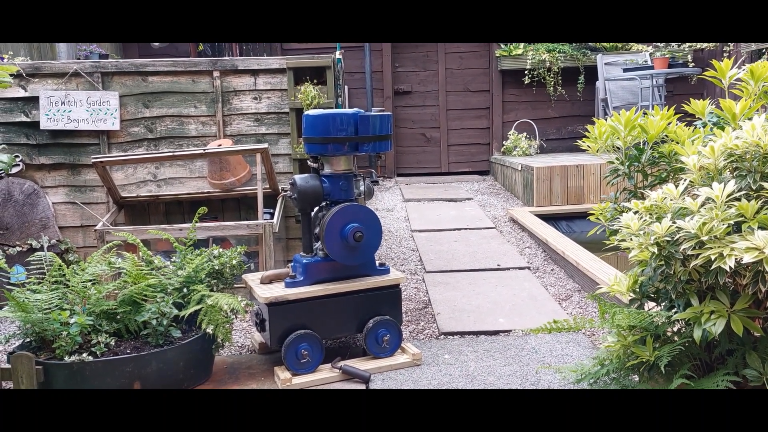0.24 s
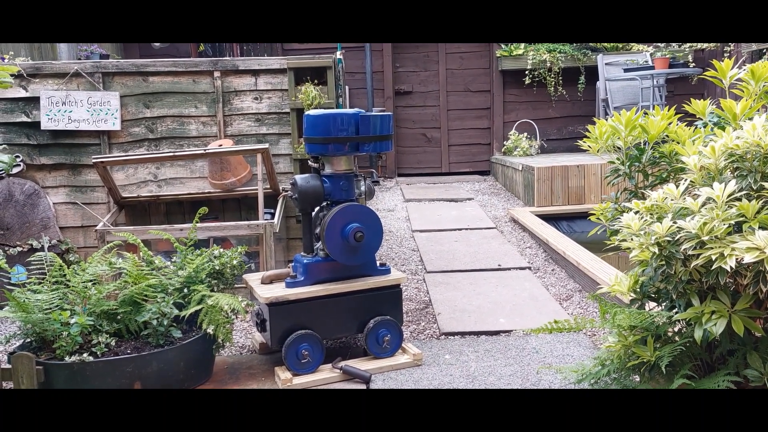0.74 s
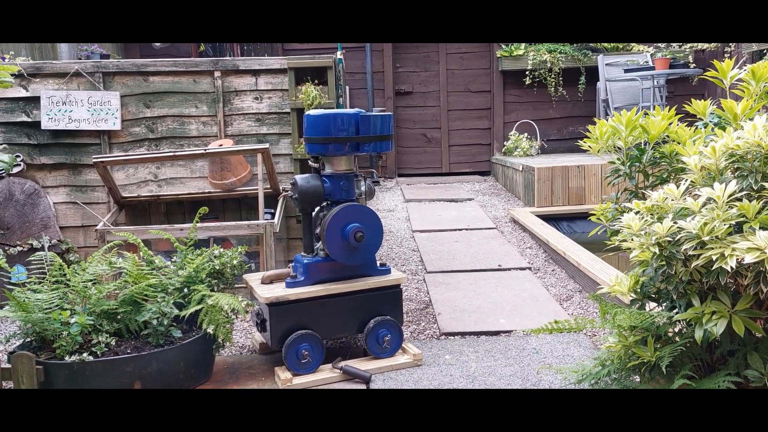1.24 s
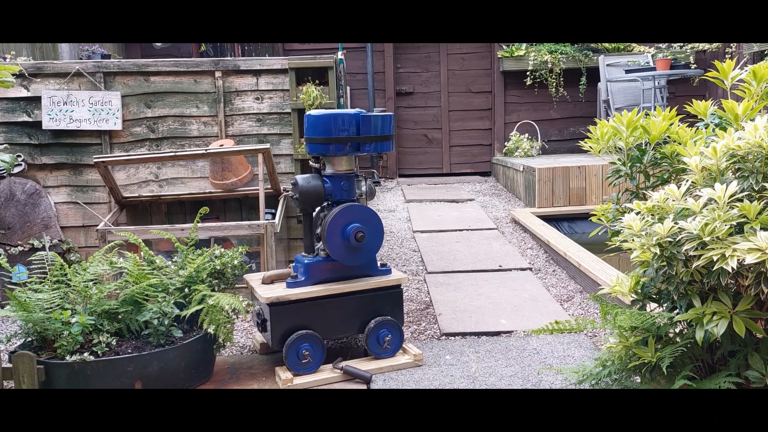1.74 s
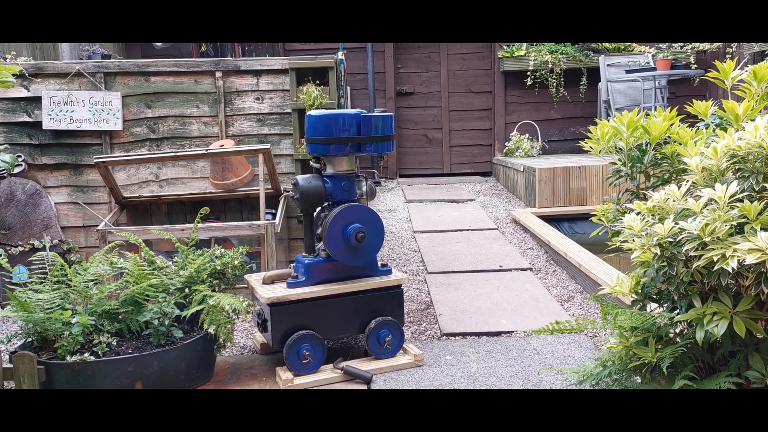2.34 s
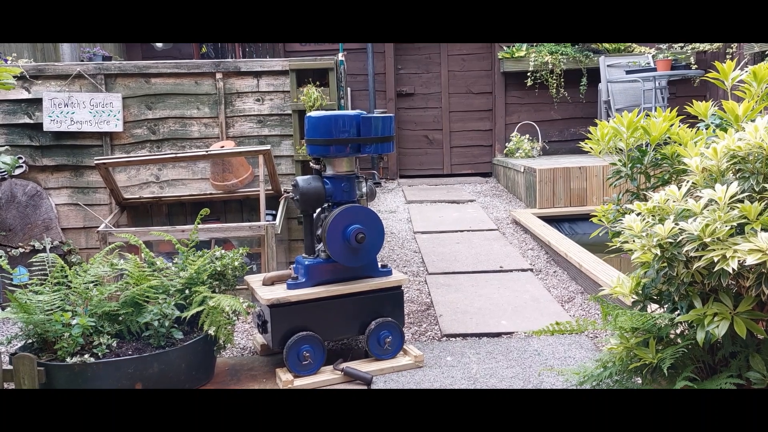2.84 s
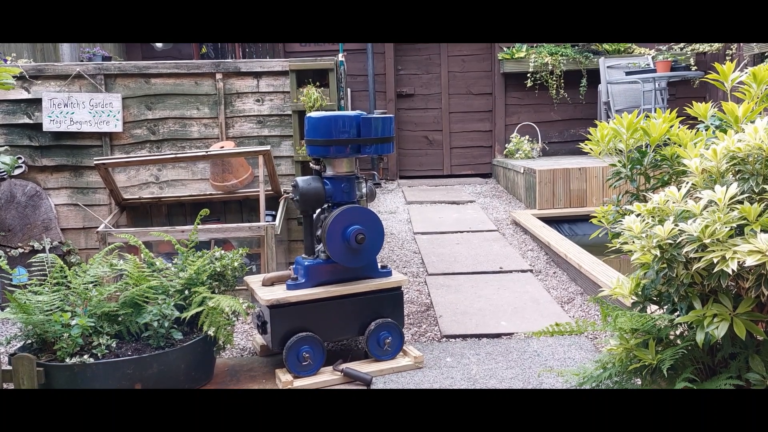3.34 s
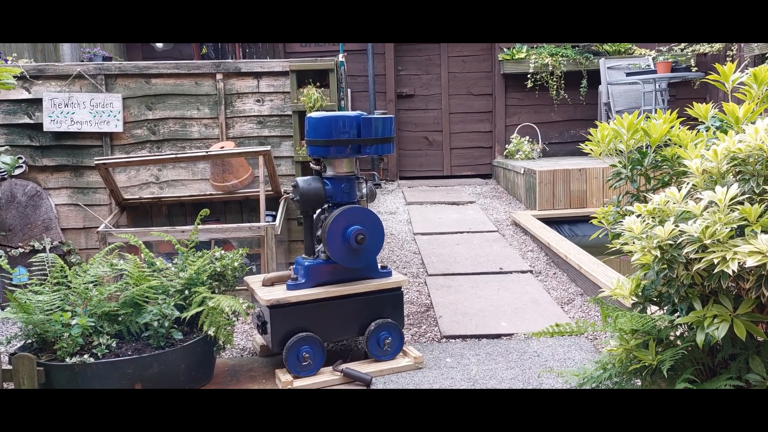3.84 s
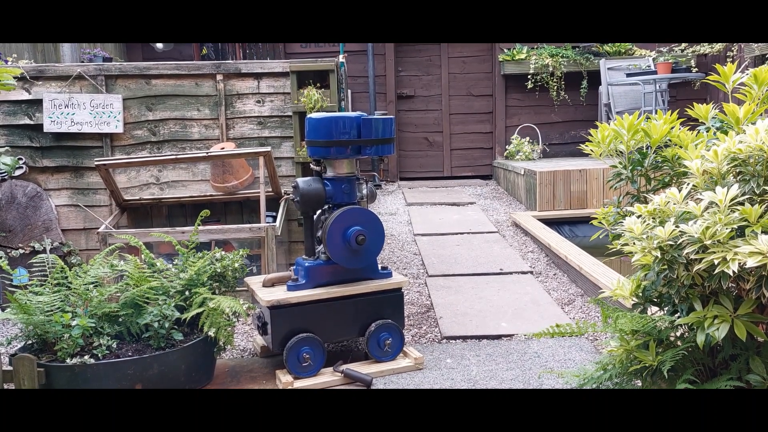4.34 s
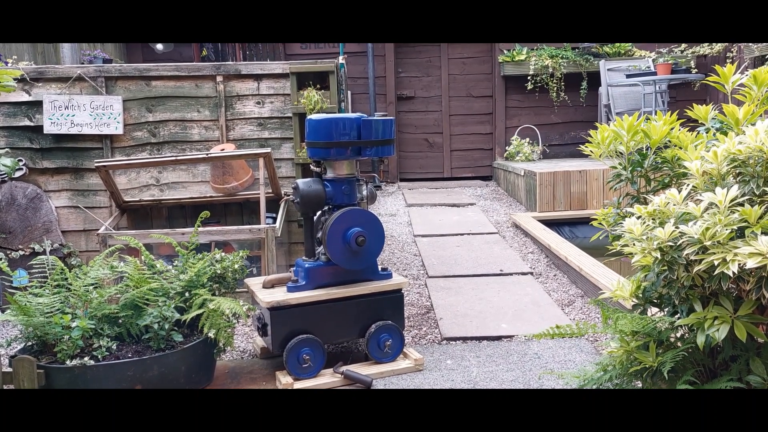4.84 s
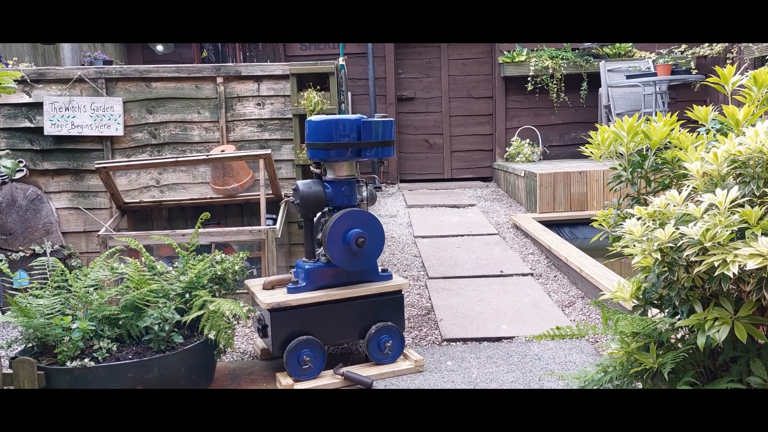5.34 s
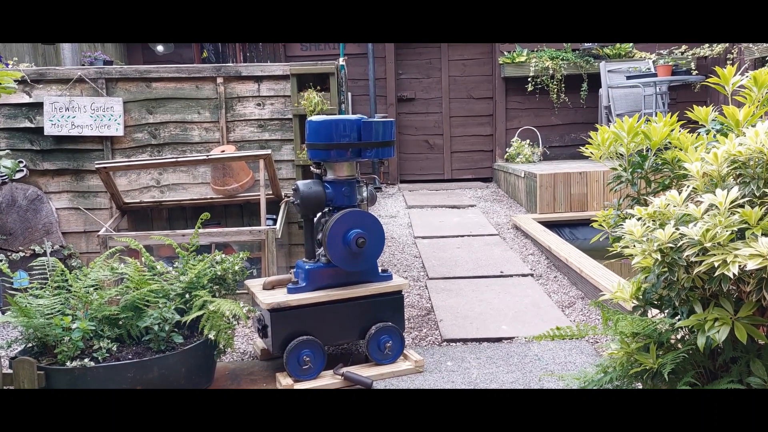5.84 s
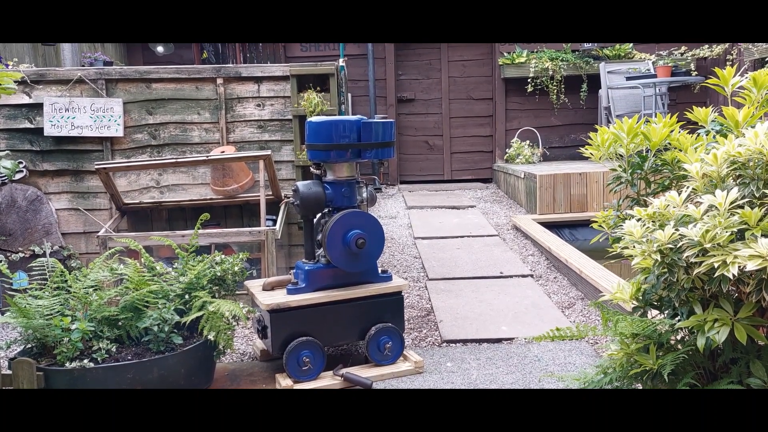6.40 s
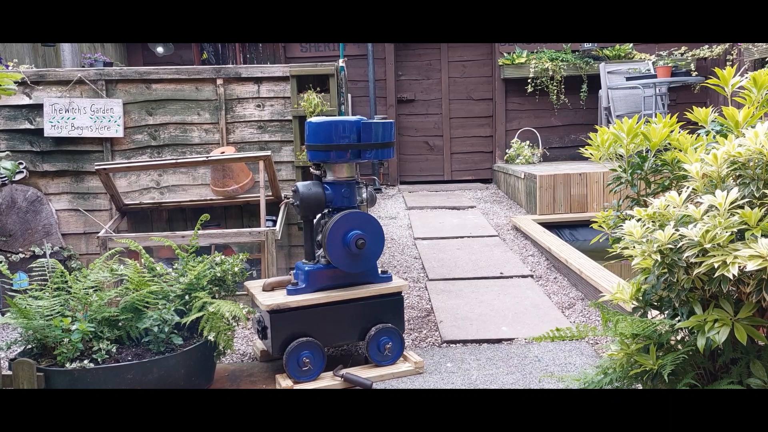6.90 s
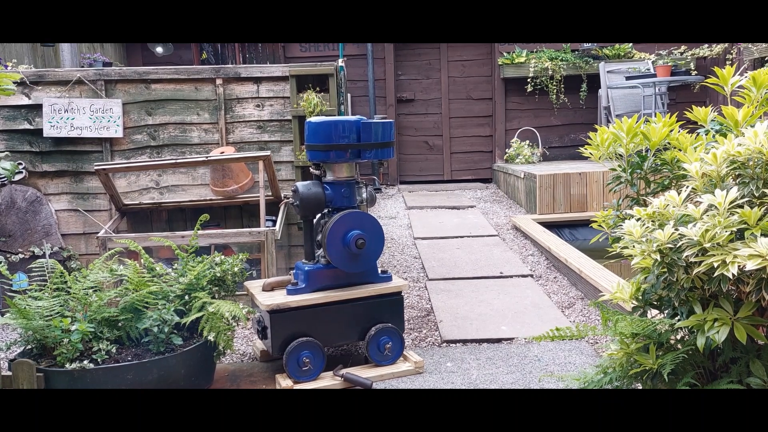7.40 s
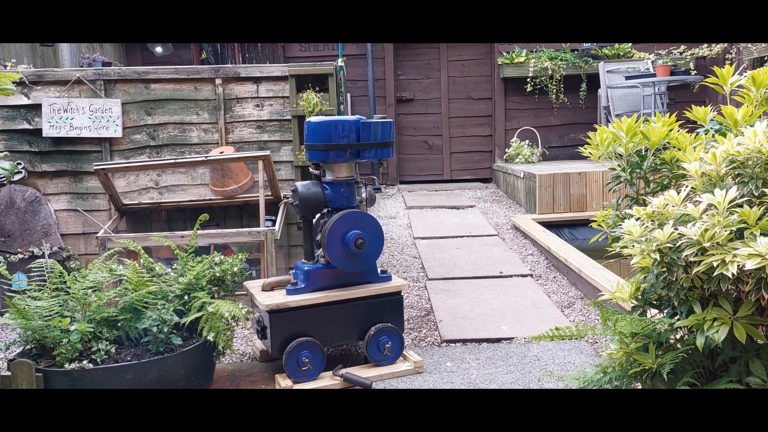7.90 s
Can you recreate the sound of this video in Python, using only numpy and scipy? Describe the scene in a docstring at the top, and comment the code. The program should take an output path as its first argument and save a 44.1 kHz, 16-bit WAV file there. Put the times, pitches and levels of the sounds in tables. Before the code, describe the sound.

A small single-cylinder petrol engine idles off load in a garden, irregular bursts of thumping, barking exhaust over fast, even mechanical ticking and hiss.

```python
"""Back garden: a small single-cylinder four-stroke engine runs off load, about 13 cycles a second.
It fires in short bursts that thump the silencer's resonances and bark as shaped noise, and only gulps in between.
Valve gear and piston knocks ring the casing, the linkage chatters, and a small gas leak hisses and whistles.
Delayed copies and a short noise tail stand for fence, shed and paving around the two microphones."""
import sys
import numpy as np
from scipy import signal
from scipy.fft import rfft, irfft
from scipy.io import wavfile

SR = 44100
rng = np.random.default_rng(int(sys.argv[2]) if len(sys.argv) > 2 else 0)


def store_wav(level_fs):
    """Save 16-bit WAV to argv[1]."""
    pcm = np.round(np.clip(np.atleast_2d(level_fs), -1, 1) * 32767)
    wavfile.write(sys.argv[1], SR, pcm.T.astype(np.int16))


N = 359856
TIME = np.arange(N) / SR
TAIL = SR // 3  # samples in every decay
CYCLE_S = 0.0785  # usual length of one engine cycle
THROTTLED_DB = -15  # a third firing meets a closing throttle


def undb(db):
    """Decibels to gain."""
    return 10 ** (np.asarray(db) / 20)


def gain_at(hz, points):
    """Gain of a (Hz, dB) curve, straight on a log-frequency axis."""
    f, db = np.transpose(points)
    return undb(np.interp(np.log(hz + 1), np.log(f), db))


def walk(rate):
    """Random drift around zero: straight lines between random points, rate of them a second."""
    knots = TIME * rate
    count = int(knots[-1]) + 2
    return 1.094 * np.interp(knots, np.arange(count), rng.standard_normal(count))


def fade(t60):
    """Exponential decay by 60 dB in t60 seconds, cut after a third of a second."""
    return 1000. ** (-TIME[:TAIL] / t60)


def mode(hz, t60):
    """One decaying resonance."""
    return np.sin(2 * np.pi * hz * TIME[:TAIL]) * fade(t60)


def strike(times, sizes, ring):
    """The same ring started at every time, each with its own size."""
    lead = len(ring)  # room for rings that start before the first sample
    out = np.zeros(N + 3 * lead)
    starts = np.round(times * SR).astype(int) + lead
    for start, size in zip(starts, sizes):
        out[start:start + lead] += size * ring
    return out[lead:lead + N]


def gas(envelope, spectrum, grain_db, scatter_t60=0.096, apart_hz=1700, scatter_share=2.7):
    """Grainy noise on an envelope; plants and paving scatter its treble, differently to each microphone."""
    # How the noise favours one side. Each row: frequency in Hz, left minus right in dB.
    side_balance = [(100, 2.5), (350, -13.5), (700, -1.5), (1100, -7.5), (2200, -0.5), (5000, 0), (9000, 1),
                    (13000, -5.5)]
    grain = undb(grain_db * walk(450))
    grain = grain / np.sqrt(np.mean(grain ** 2))
    # white noise with a power of 1 per Hz, before envelope and spectrum
    noise = rng.standard_normal(N) * np.sqrt(SR / 2)
    source = noise * envelope * grain
    scatter = rng.standard_normal((2, TAIL)) * fade(scatter_t60)
    scattered = rfft(scatter / np.sqrt(np.sum(scatter ** 2) / 2), N)
    hz = np.arange(N // 2 + 1) * SR / N
    apart = scatter_share * hz / np.hypot(hz, apart_hz)
    lean = np.sqrt(gain_at(hz, side_balance))
    # the direct sound reaches the right microphone a little later
    direct = np.exp(-2j * np.pi * hz * np.array([[0], [.00007]]))
    paths = (direct + apart * scattered) / np.sqrt(1 + apart ** 2)
    ears = paths * np.array([lean, 1 / lean])
    return irfft(rfft(source) * gain_at(hz, spectrum) * ears, N)


def reflect(x):
    """Direct sound plus the near echoes at each microphone."""
    # Nearby surfaces, one list for the left and one for the right microphone.
    # Each row: delay in seconds, signed gain.
    surfaces = [
        [(.0085, -.11), (.0129, 0.0036), (.0228, 0.053), (.029, -0.33)],
        [(.0039, 0.22), (.0103, 0.22), (.0284, -0.21), (.0321, -0.057), (.0448, 0.14)],
    ]
    ears = []
    for rows in surfaces:
        echoes = sum(gain * np.pad(x, (int(delay * SR), 0))[:N] for delay, gain in rows)
        ears.append(x + echoes)
    return np.array(ears)


def governor(coast_db=-21.5, starve_db=-21, coast_spread_db=0.3):
    """Time and strength (dB) of every cycle: a burst of firings, then the flywheel coasts evenly to the next."""
    # Short bursts in which the engine fires. Each row: first firing in seconds, number of firings,
    # strength of the first in dB, step to the second in dB.
    firing_bursts = [(-.008, 1, -12, -2), (0.0706, 2, -5, -3.5), (.389, 1, -15.5, 0), (.468, 2, 0, -7),
                     (.866, 1, -18.5, 0), (0.9449, 3, -1, -10), (1.345, 3, -2, -2.5), (1.663, 3, -6, -6.5),
                     (1.902, 2, -8.5, -1.5), (2.143, 2, -17.5, 4.5), (2.303, 1, -7.5, 0),
                     (2.4609, 2, -6, -1.5), (2.8621, 3, -2.5, 3.5), (3.175, 1, -6.5, 0),
                     (3.409, 3, -2.5, 1), (3.874, 3, -1, -1.5), (4.264, 2, -5, 1.5), (4.6518, 3, -1, 1.5),
                     (5.0397, 2, -5, -0.5), (5.272, 2, -11.5, 0), (5.5826, 2, -13, 8.5), (5.8165, 1, -6, 0),
                     (5.971, 3, -10.5, 2.5), (6.283, 3, -10, 1.5), (6.592, 2, -7, -8.5), (6.748, 1, -8, 0),
                     (6.981, 2, -11.5, 6.5), (7.2148, 3, -12.5, 4.5), (7.4493, 1, -9, 0),
                     (7.608, 1, -11, 0), (7.766, 1, -5, 0), (7.923, 2, -18.5, 7.5)]
    times, strength_db = [], []
    closing = (firing_bursts[-1][0] + 3 * CYCLE_S, 1, THROTTLED_DB, 0)  # only ends the last coast
    following = [*firing_bursts[1:], closing]
    for (start, firings, first_db, step_db), (end, _, next_db, _) in zip(firing_bursts, following):
        cycles = round((end - start) / CYCLE_S)
        fired = [first_db, first_db + step_db, THROTTLED_DB][:round(firings)]
        # the emptier the strokes between bursts, the harder the next bang
        uneven_db = coast_spread_db * rng.standard_normal(cycles - len(fired))
        coasting = coast_db + starve_db * undb(next_db) ** 2 + uneven_db
        times.extend(np.linspace(start, end, cycles, endpoint=False))
        strength_db.extend([*fired, *coasting])
    return np.array(times), np.array(strength_db)


def thump(strength_db, knee_db=-13.5, sharpness=2.42):
    """Level of the silencer's thump (dB): it follows weak firings and levels off at 0 dB for hard ones."""
    return -20 / sharpness * np.log10(1 + undb(knee_db - strength_db) ** sharpness)


def exhaust(times, thump_db, puff_hz=205, puff_size=0.12, puff_lead=0.0028, blow_lag=0.0017):
    """The valve cracks open with a soft puff, then the blow-down rings the silencer."""
    # Silencer resonances. Each row: frequency in Hz, t60 in seconds, signed gain at a 0 dB thump,
    # growth with the thump as a power.
    resonances = [(52.5, 0.25, 0.078, 0.48), (166.7, 0.16, -0.42, 0.94), (296.1, 0.23, -0.055, 2.45),
                  (353.8, 0.11, 0.12, 1.77), (373.1, 0.18, 0.14, 4.5)]
    force = undb(thump_db)
    puff = np.sin(2 * np.pi * puff_hz * TIME[:int(SR / puff_hz)])  # one full wave
    out = strike(times - puff_lead, puff_size * force ** 0.74, puff)
    for hz, t60, gain, growth in resonances:
        out = out + strike(times + blow_lag, gain * force ** growth, mode(hz, t60))
    return reflect(out)


def bark(times, bark_db, bark_t60=0.096, spray_t60=0.18, rise_t60=0.0077, rasp_lag=0.0075, rasp_t60=0.092):
    """A burst of turbulence with each firing, then a rasp at the outlet; the fine spray lasts longest."""
    # Turbulent exhaust gas. Each row: frequency in Hz, density in dB per Hz before the envelope.
    turbulence = [(100, -52), (290, -54), (365, -47), (450, -63), (540, -55.5), (680, -53.5), (900, -54.5),
                  (1020, -49), (1110, -44), (1190, -78), (1300, -57.5), (2200, -60), (3200, -67),
                  (5500, -87), (9000, -94)]
    # Rasp of the gas as it leaves the outlet. Each row: frequency in Hz, density in dB per Hz before the envelope.
    outlet_rasp = [(1150, -88), (1450, -66), (1900, -51), (2300, -53), (2650, -60.5), (3500, -74.5)]
    # Spray of gas at the outlet. Each row: frequency in Hz, density in dB per Hz before the envelope.
    outlet_spray = [(1500, -71.5), (3500, -75), (5600, -73), (6200, -79), (7500, -74), (9800, -81),
                    (12500, -69.5), (16000, -83)]
    rise = fade(rise_t60)
    burst = strike(times, undb(bark_db), fade(bark_t60) - rise)
    rasp = strike(times + rasp_lag, undb(0.85 * bark_db), fade(rasp_t60) - rise)
    spray = strike(times - .0005, undb(0.73 * bark_db), fade(spray_t60) - rise)
    blast = gas(burst * undb(3.0), turbulence, grain_db=0.5, scatter_t60=0.059)
    # the shed door returns the blast
    returned = np.pad(blast, ((0, 0), (int(0.028 * SR), 0)))[:, :N]
    blast = blast + undb(-9) * returned
    rasping = gas(rasp, outlet_rasp, grain_db=2.5, scatter_t60=0.047)
    spraying = gas(spray * undb(7.0), outlet_spray, grain_db=1.0, scatter_t60=0.021)
    return blast + rasping + spraying


def crack(times, bark_db, lag=0.00081, steepness=1.27):
    """The steep pressure front of a hard firing rings the outlet."""
    # Outlet modes. Each row: frequency in Hz, t60 in seconds, level in dB at a 0 dB firing.
    outlet_modes = [(928, 0.044, -16), (1099.3, 0.083, -22), (532, 0.24, -31)]
    rings = [strike(times + lag, -undb(db + steepness * bark_db), mode(hz, t60))
             for hz, t60, db in outlet_modes]
    return reflect(sum(rings))


def gulp(times, thump_db, end_hz=50, glide_hz=42, glide_s=0.032, swell_s=0.013, gulp_db=-22.0):
    """After a weak firing gas is sucked back through the silencer: a low note that sags."""
    t = TIME[:SR // 6]
    turns = end_hz * t + glide_hz * glide_s * (1 - np.exp(-t / glide_s))
    swell = t / swell_s * np.exp(1 - t / swell_s)
    note = np.sin(2 * np.pi * turns) * swell
    weakness = np.clip((-thump_db - 5) / 13, 0, 1)
    return strike(times - .001, weakness * undb(gulp_db), note)


def machinery(times, phase):
    """Knocks ring the casing each cycle; the rattle swells as the piston comes under load."""
    # Valve gear and piston knocks. Each row: place in the cycle from 0 to 1, relative level in dB.
    knocks = [(.54, -2.5), (0.71, 3.5), (.84, 5)]
    # Casing and tank modes. Each row: frequency in Hz, t60 in seconds, typical level in dB at a 0 dB knock.
    casing_modes = [(240, 0.18, -35.5), (382.8, 0.18, -34), (616, 0.2, -45), (830, 0.35, -66),
                    (967, 0.057, -38.5), (2080, 0.043, -50.5)]
    # Rubbing and rattling parts. Each row: frequency in Hz, density in dB per Hz before the envelope.
    rubbing = [(25, -58), (80, -65), (170, -48.5), (270, -64.5), (400, -57.5), (480, -74.5), (800, -64.5),
               (1020, -65), (1250, -72.5), (1900, -67), (2500, -81), (3200, -80.5), (6000, -86.5)]
    place, knock_db = np.transpose(knocks)
    when = (times[:-1, None] + np.diff(times)[:, None] * place).ravel()
    when = when + 0.00055 * rng.standard_normal(len(when))
    size = undb(np.tile(knock_db, len(times) - 1))
    ring = np.zeros(N)
    for hz, t60, db in casing_modes:
        mode_db = db + 2.37 * rng.standard_normal(len(when))
        ring = ring + strike(when, size * undb(mode_db), mode(hz, t60))
    load_db = np.interp(phase, [.1, .42, .56, .72, .9], [-5.5, -3, 1.5, -0.1, -3.5], period=1)
    rattle = gas(undb(load_db + 1.43 * walk(30)), rubbing, grain_db=1.5)
    return reflect(ring) + rattle


def chatter(times, chance=0.63, strongest_db=-4, spread_db=7, chatter_t60=0.057, earliest=0.49, leeway=0.12):
    """Loose linkage chatters on many compression strokes, now and then loudly."""
    # Loudest chatters of the linkage. Each row: start in seconds, envelope level in dB.
    loudest = [(.118, 1), (2.66, 3), (6.633, -2.5), (7.178, 0.5), (7.418, 1), (7.968, 0)]
    luck, place, softness = rng.random((len(times), 3)).T
    shudder = fade(chatter_t60) - fade(0.015)
    faint_s = times + (earliest + leeway * place) * CYCLE_S
    # strongest_db is the top level of these random chatters
    faint = strike(faint_s, (luck < chance) * undb(strongest_db - spread_db * softness), shudder)
    loud_s, loud_db = np.transpose(loudest)
    shake = faint + strike(loud_s, undb(loud_db), shudder)
    return gas(shake, [(900, -68), (1600, -52), (2400, -58.5), (3600, -75)], grain_db=4.5)


def leak(phase):
    """Gas hisses out from the start of compression and dies away once the exhaust opens."""
    # Leaking gas. Each row: frequency in Hz, density in dB per Hz before the envelope.
    hiss = [(2000, -73), (3500, -79), (5400, -78), (6250, -84.5), (6900, -71.5), (7700, -79), (10000, -86),
            (12000, -72.5), (13600, -90), (14400, -70), (16000, -104)]
    places = [.03, .3, .48, .54, .66, .8, .92]
    pressure_db = np.interp(phase, places, [-5.5, -18.5, -11, 0.0, 0.0, 0.0, 1.0], period=1)
    return gas(undb(pressure_db + 0.79 * walk(25)), hiss, grain_db=2.0, scatter_t60=0.068)


def whistle(times, phase, pitch_hz=6975, pitch_per_db_hz=14, waver_hz=22, level_db=-27.5):
    """The leak sings in two swells under pressure; softer whistles sound flatter."""
    # the whistle's level varies at random each cycle
    cycle_level_db = -4 + 2 * rng.standard_normal(len(times))
    cycle = np.clip(np.searchsorted(times, TIME) - 1, 0, len(times) - 1)
    loudness_db = cycle_level_db[cycle]
    places = [.1, .49, .55, .6, .65, .73, .84, .92]
    shape_db = np.interp(phase, places, [-21, -25, -2.0, -8.5, -7.5, -5.0, -9.5, -19], period=1)
    hz = pitch_hz + pitch_per_db_hz * loudness_db + waver_hz * walk(250)
    angle = 2 * np.pi * np.cumsum(hz) / SR
    swell = undb(level_db + loudness_db + shape_db + 2.2 * walk(200))
    ears = []
    for turn in (0, .9):  # phase at the left and right microphone, in radians
        tone = np.sin(angle + turn) + undb(-21) * np.sin(2 * angle)
        ears.append(swell * undb(2 * walk(60)) * tone)
    return np.array(ears)


def garden(dry, t60=0.11, wet_db=-18):
    """A short, faint wash from fences and house walls."""
    tail = rng.standard_normal((2, TAIL)) * (fade(t60) - fade(t60 / 4))
    tail = tail * undb(wet_db) / np.sqrt(np.sum(tail ** 2) / 2)
    return signal.fftconvolve(dry, tail, axes=1)[:, :N]


def scene():
    """All parts but the loudest chatters follow the engine cycle; the exhaust points a little to the right."""
    times, bark_db = governor()
    thump_db = thump(bark_db)
    turns = np.append(times, times[-1] + CYCLE_S)
    phase = np.interp(TIME, turns, np.arange(len(turns))) % 1
    low = (exhaust(times, thump_db) + gulp(times, thump_db)) * undb([[-2.1], [.2]])  # left, right
    firing = low + crack(times, bark_db) + bark(times, bark_db)
    moving_parts = machinery(turns, phase) + chatter(times)
    leaking = leak(phase) + whistle(times, phase)
    dry = firing + moving_parts + leaking
    return dry + garden(dry)


def record(dry, low_cut_hz=29, top_hz=15650, ceiling=0.9, hardness=5):
    """The microphone drops the deepest bass, rounds the hardest bangs and cuts the top."""
    hz = np.arange(N // 2 + 1) * SR / N
    thin = irfft(rfft(dry) * (1 - np.exp(-(hz / low_cut_hz) ** 4)), N)
    rounded = thin / (1 + np.abs(thin / ceiling) ** hardness) ** (1 / hardness)
    top_cut = signal.ellip(10, .2, 80, top_hz, fs=SR, output="sos")
    return signal.sosfilt(top_cut, rounded)


dry = scene()
out = record(dry)
store_wav(out)
```